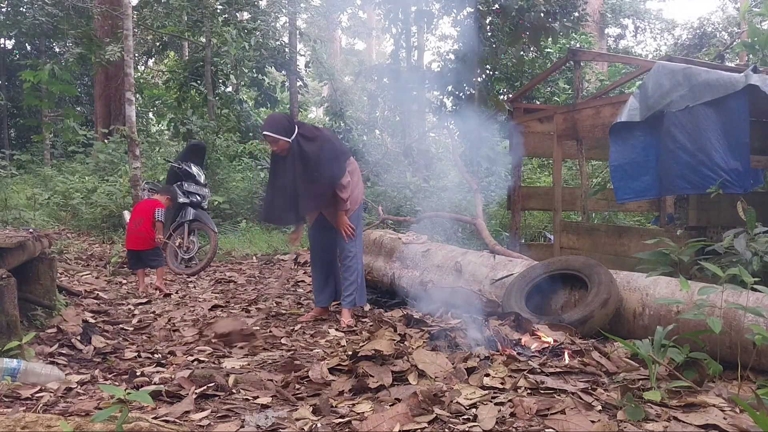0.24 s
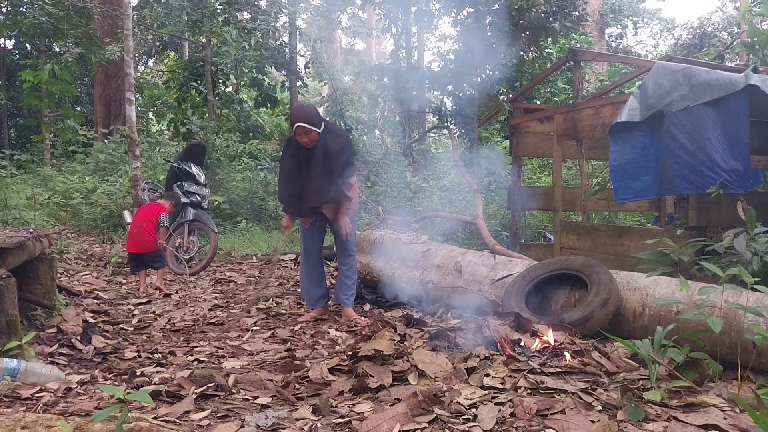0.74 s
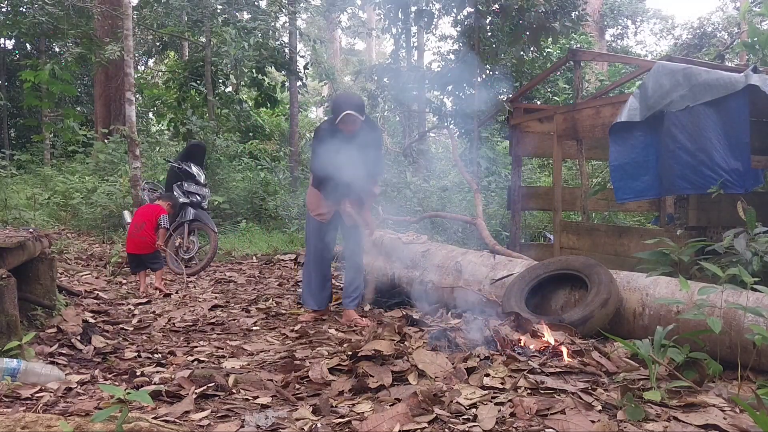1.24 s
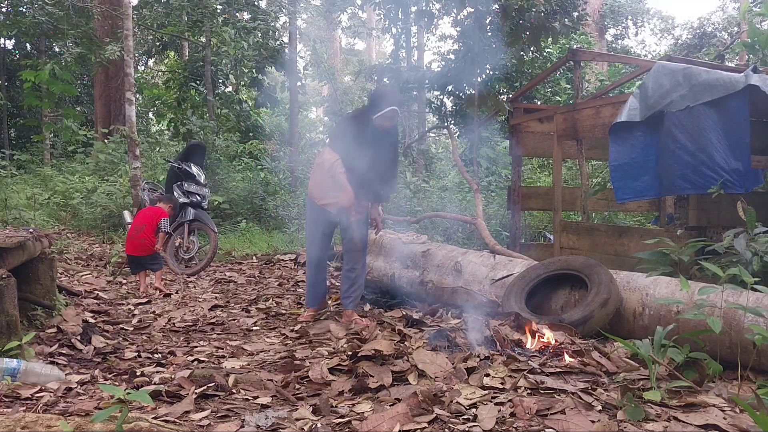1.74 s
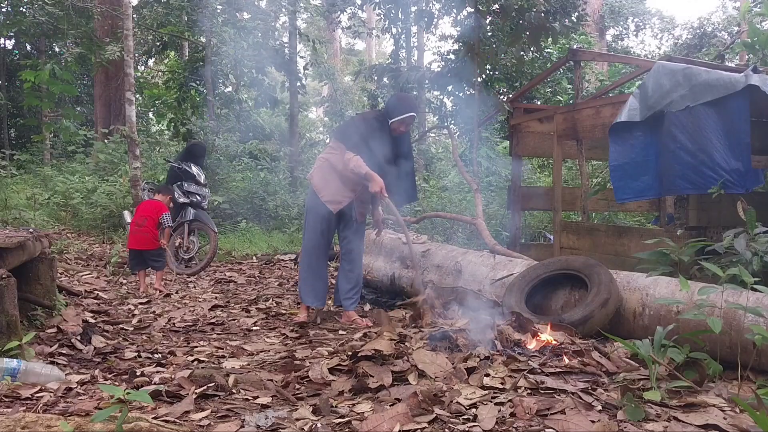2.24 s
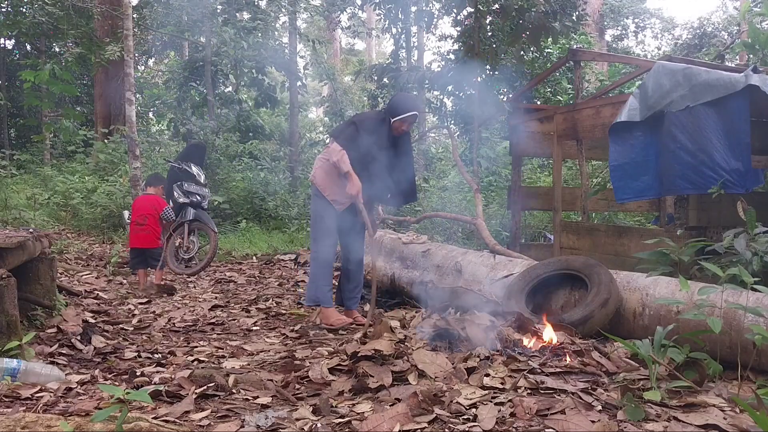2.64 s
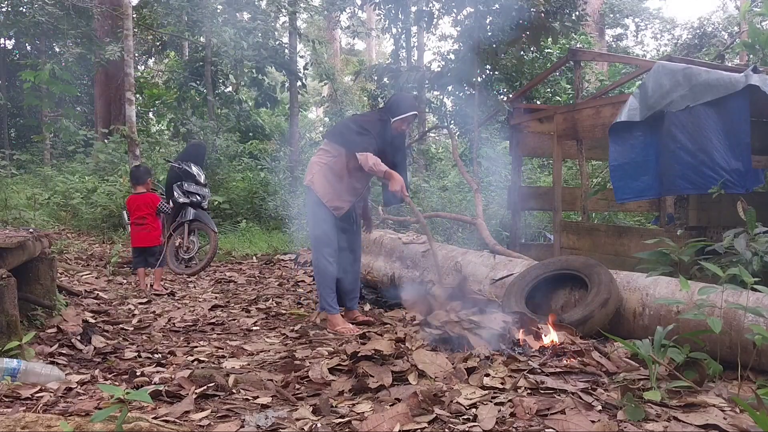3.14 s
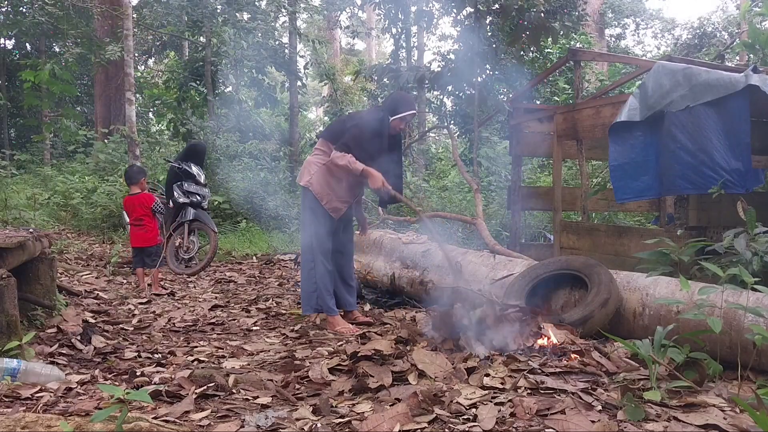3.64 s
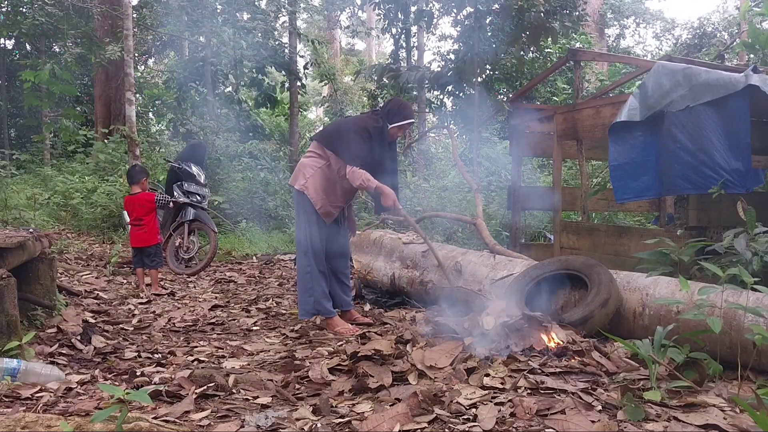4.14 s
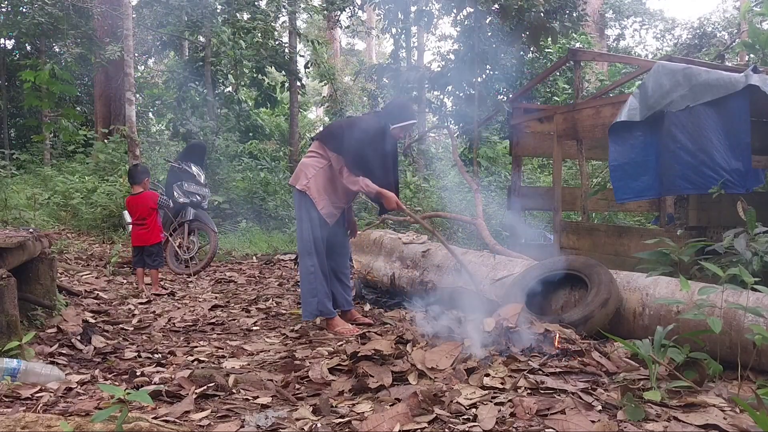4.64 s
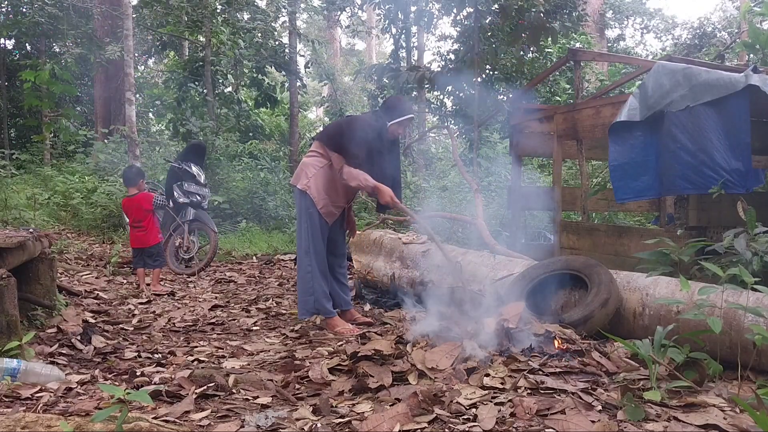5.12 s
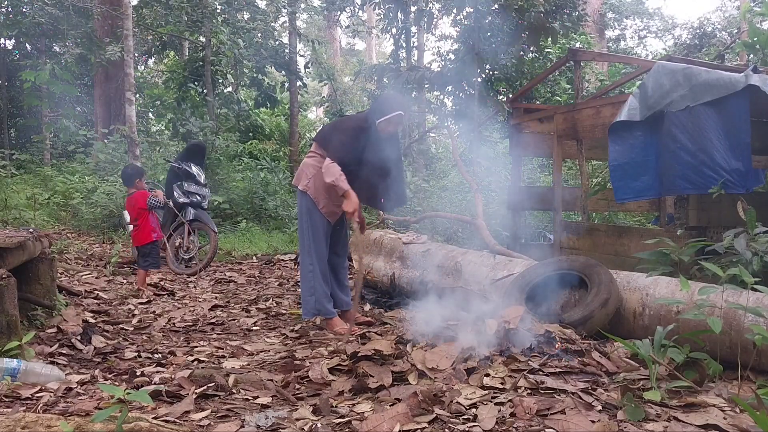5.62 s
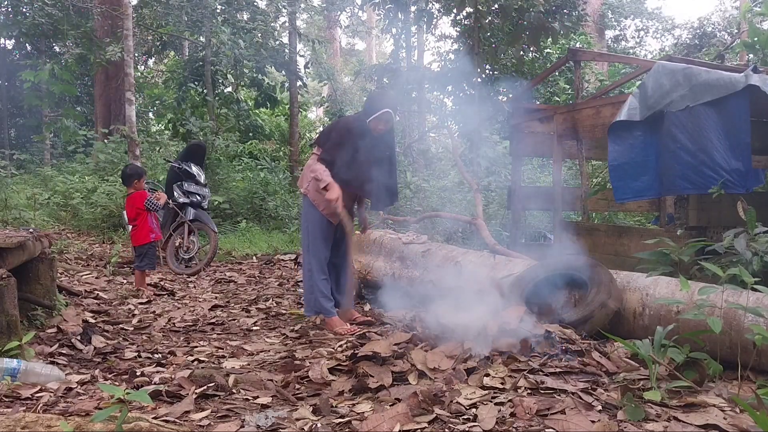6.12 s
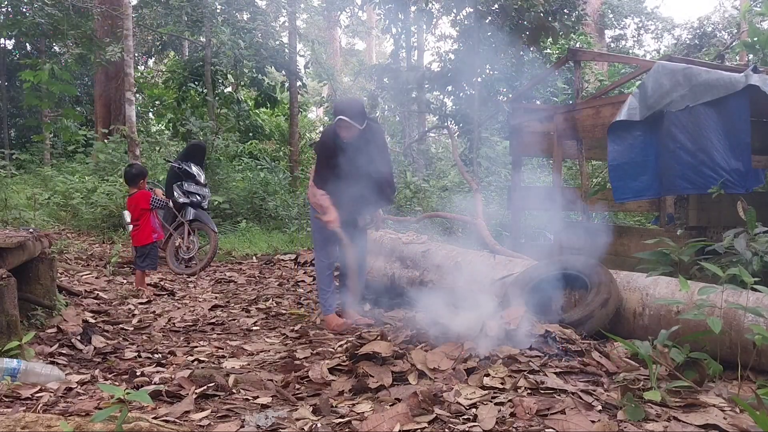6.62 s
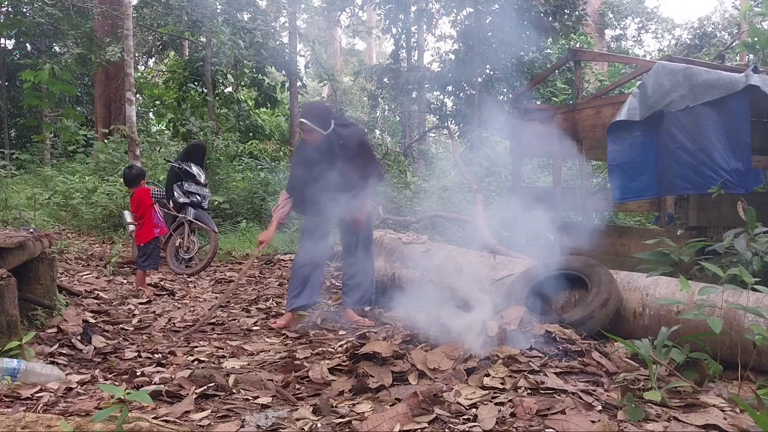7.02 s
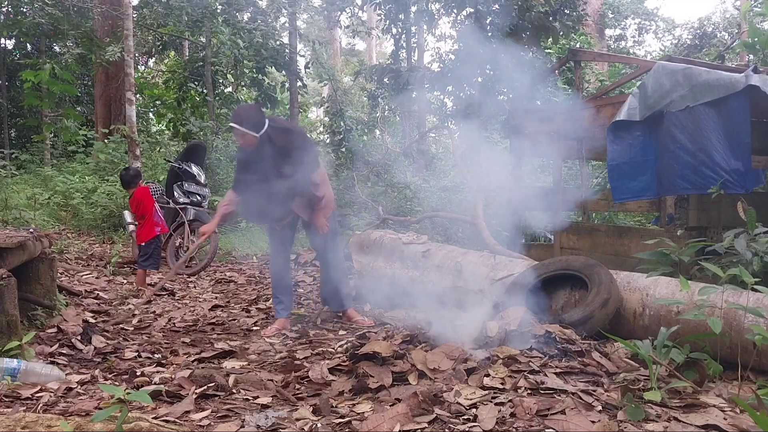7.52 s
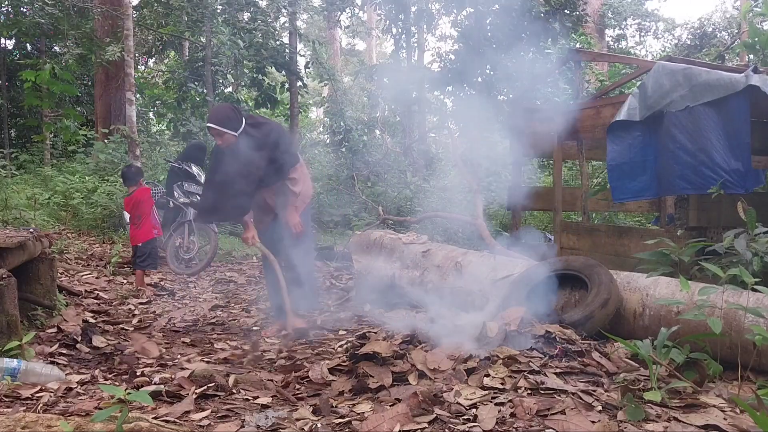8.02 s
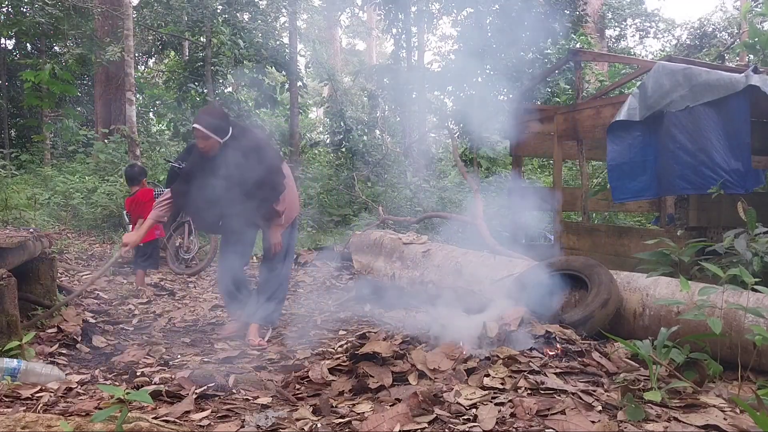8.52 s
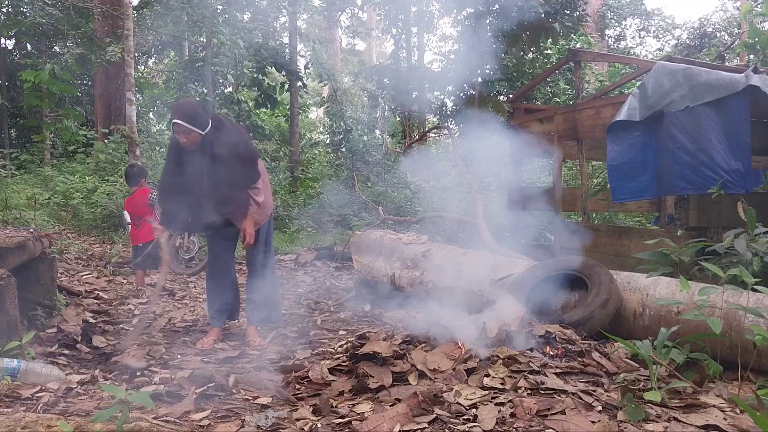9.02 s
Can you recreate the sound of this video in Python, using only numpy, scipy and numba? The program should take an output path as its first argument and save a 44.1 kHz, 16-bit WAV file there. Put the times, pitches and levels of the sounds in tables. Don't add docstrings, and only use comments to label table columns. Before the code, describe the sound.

Bursts of crisp leaf rustle, dull wood knocks and sharp twig cracks close by, while shrill cicadas swell and fade over a hissing chorus outdoors.

```python
import sys
import numpy as np
from scipy import signal
from scipy.fft import rfft, irfft, next_fast_len
from scipy.io import wavfile
from scipy.ndimage import uniform_filter1d
from numba import njit

SR = 44100
rng = np.random.default_rng(int(sys.argv[2]) if len(sys.argv) > 2 else 0)


def invert_db(x):
    u = np.asarray(x, float) / 20
    return 10 ** u


def master(y):
    cut = np.clip(np.atleast_2d(y).T, -1, 1)
    pcm = np.round(cut * 32767)
    wavfile.write(sys.argv[1], SR, pcm.astype(np.int16))


N = 408807
TIME = np.arange(N) / SR


def coloured(shape):
    size = next_fast_len(N)
    hz = np.arange(size // 2 + 1) * SR / size + 1
    x = irfft(rfft(rng.standard_normal(size)) * shape(hz), size)[:N]
    return x / x.std()


def band(hz, width_hz):
    return coloured(lambda f: 1 / (1 + ((f - hz) / width_hz) ** 2))


def walk(rate):
    k = int(SR / rate)
    steps = np.repeat(rng.standard_normal(N // k + 1), k)
    x = uniform_filter1d(uniform_filter1d(steps, k), k)[:N]
    return x / x.std()


def smooth_noise(size, hz):
    k = int(SR / hz)
    return uniform_filter1d(uniform_filter1d(rng.standard_normal(size), k), k) * np.sqrt(1.5 * k)


def gate(t0, t1, fade_s):
    return np.clip(np.minimum(TIME - t0, t1 - TIME) / fade_s + .5, 0, 1)


@njit
def grains(start, hz, cycles, size):
    out = np.zeros(N)
    for k in range(len(start)):
        decay = hz[k] / SR / cycles[k]
        p, z = np.exp(2j * np.pi * hz[k] / SR - decay), size[k] * np.e * decay + 0j
        first = int(start[k] * SR)
        for i in range(min(N - first, int(7 / decay))):
            out[first + i] += i * z.imag
            z *= p
    return out


def strike(rows):
    return grains(*np.array(rows, float).T.copy())


WANDER = walk(24)


def wander(on):
    return np.roll(WANDER, rng.integers(N))[on]


def song_span(s):
    return slice(max(0, int(s[0] * SR)), min(N, int(s[-1] * SR)))


def sing(s, ends_hz, parts, rough_db, rough_hz, rasp_db):
    on = song_span(s)
    t = TIME[on]
    bend = 1.5 if ends_hz[1] > ends_hz[0] else 1
    left = ((s[-1] - t) / (s[-1] - s[0])) ** bend
    hz = ends_hz[1] + (ends_hz[0] - ends_hz[1]) * left + 3 * wander(on)
    phase = 2 * np.pi * np.cumsum(hz) / SR
    skirt = 1 + invert_db(rough_db) * smooth_noise(len(t), rough_hz)
    skirt += invert_db(rasp_db) * smooth_noise(len(t), 700)
    skirt += invert_db(-32) * rng.standard_normal(len(t))
    askew = invert_db(rough_db) * smooth_noise(len(t), rough_hz)
    out = np.zeros(N)
    for k, db, flutter_db in parts:
        fade = invert_db(db + flutter_db * wander(on))
        out[on] += np.sqrt(2) * fade * (skirt * np.sin(k * phase) + askew * np.cos(k * phase))
    return out * gate(s[0] + .01 if s[0] else -1, s[-1] - .01, .02)


def near_cicadas():
    # time in seconds, whistle level in dB.
    songs = [
        [(0, -17.5), (.15, -14), (.38, -11.5), (.62, -13.5), (.87, -16.5), (1.3, -15), (1.47, -10), (1.65, -16),
         (2.27, -31)],
        [(2.26, -40), (2.3, -23), (2.42, -26.5), (2.53, -43)],
        [(5.33, -47), (5.41, -35), (5.55, -26), (5.67, -22), (5.82, -24.5), (5.98, -24.5), (6.14, -34),
         (6.21, -52)],
        [(7.25, -52), (7.46, -29), (7.65, -22.5), (7.8, -25), (7.94, -20.5), (8.05, -23), (8.14, -36),
         (8.28, -44), (8.35, -60)],
    ]
    glides = [(12089, 11917), (11915, 11896), (11782, 11910), (11797, 11938)]
    # start and end in seconds, level in dB, flutter in dB.
    drones = [
        (.28, 1.82, -36.5, .6),
        (2.36, 2.5, -46, 3),
        (5.42, 5.98, -46, 2.5),
        (7.32, 7.88, -44.5, 2.1),
    ]
    # time in seconds, depth in dB.
    dips = [(.08, -7), (.21, -4), (.43, -7), (.67, 2), (1.05, -4), (1.15, 3), (1.22, -4), (1.59, -5),
            (1.77, -11), (1.89, -8), (2.0, -2), (2.09, -7), (2.19, -9), (5.59, -10), (5.74, -13),
            (5.92, -8), (7.68, -10), (7.74, -11), (7.82, -6), (5.49, -4), (.27, -2), (8.2, -10)]
    # time in seconds, depth in dB.
    notches = [(5.95, -6), (6.008, -10), (6.09, -9), (7.56, -5), (7.668, -9), (8.024, -6), (8.068, -10),
               (8.1, -8), (5.43, -4), (7.4, -4)]
    # multiples of the whistle, then their dB under the lower side tone.
    side_ratios = [36 / 35, 33 / 35, 37 / 35, 32 / 35, 38 / 35]
    side_levels = [-8, -16, -19, -29, -24]
    # multiple of the belly tone, level in dB under it.
    belly_tones = [(2, -10), (3, -16), (5, -15)]
    out = np.zeros(N)
    for song, ends_hz, (t0, t1, drone_db, drone_flutter_db) in zip(songs, glides, drones):
        s, levels = np.transpose(song)
        on = song_span(s)
        t = TIME[on]
        whistle = np.interp(t, s, levels)
        swell = uniform_filter1d(whistle, int(.4 * SR), mode="nearest")
        side = -32.5 + .85 * (swell + 15)
        belly = drone_db - 9 * (1 - gate(t0, t1, .12)[on])
        for events, dip_s in ((dips, .025), (notches, .012)):
            whistle = whistle + sum(db * np.exp(-((t - at) / dip_s) ** 2) for at, db in events)
        levels = [(1, whistle), (34 / 35, side), (1 / 4, belly)]
        levels += [(k, side + db) for k, db in zip(side_ratios, side_levels)]
        levels += [(k / 4, belly + db) for k, db in belly_tones]
        parts = []
        for k, db in levels:
            flutter_db = drone_flutter_db if k <= 1 / 2 else .55 if k <= 1 else 3.2
            parts.append((k, db, flutter_db))
        out += sing(s, ends_hz, parts, -19, 70, -24 if s[0] < 5 else -17)
    return out


def far_singer(s, levels, ends_hz, flutter_db, rough_db, rough_hz, rasp_db=-24):
    whistle = np.interp(TIME[song_span(s)], s, levels)
    parts = [(1, whistle, flutter_db)]
    if ends_hz[0] > 8000:
        parts += [(1 / 4, whistle - 17, flutter_db)]
    return sing(s, ends_hz, parts, rough_db, rough_hz, rasp_db)


def thin_singers():
    # start and end in seconds, start and end pitch in Hz; then the level of each in dB.
    thin_songs = [(.85, 2.45, 11944, 11792), (2.45, 5.45, 12048, 11793), (2.45, 5.1, 12124, 11865),
                  (6.0, 7.0, 11760, 11825), (7.15, 9.0, 11571, 11790), (7.0, 7.6, 11150, 11216),
                  (8.95, 9.5, 11314, 11400), (6.1, 6.55, 2650, 2755), (6.6, 7.9, 2705, 2810),
                  (1.7, 2.35, 2690, 2790), (-.1, 1.8, 12298, 12150), (8.2, 8.9, 2790, 2860),
                  (9.1, 9.5, 11815, 11850), (3.5, 4.7, 11710, 11830), (7.45, 8.1, 11216, 11220),
                  (2.25, 2.65, 2660, 2800), (8.9, 9.5, 11090, 11040)]
    thin_levels = [-39, -47, -51, -49, -47.5, -42.5, -42, -59, -52, -54, -43, -58, -42, -55, -41, -53, -55]
    out = np.zeros(N)
    for (t0, t1, *ends_hz), db in zip(thin_songs, thin_levels):
        levels = db - 17.5 * np.array([1, 0, 0, 1])
        out += far_singer([t0, t0 + .13, t1 - .16, t1], levels, ends_hz, 3.2, -7, 55)
    return out


def steady_singers():
    # time in seconds, level in dB.
    swells = [
        [(7.25, -58), (7.38, -52), (7.45, -44), (7.6, -45), (7.72, -43), (7.85, -56)],
        [(7.2, -60), (7.33, -51), (7.45, -56), (7.6, -52), (7.78, -53), (7.86, -62)],
        [(7.42, -64), (7.5, -55), (7.7, -57), (7.8, -64)],
        [(9.08, -62), (9.15, -53), (9.23, -47), (9.4, -47)],
        [(.1, -60), (.16, -49), (.24, -48), (.3, -60)],
        [(0, -37), (.15, -38), (.25, -43), (.36, -52)],
        [(0, -45), (.11, -45), (.2, -58)],
        [(6.85, -64), (6.95, -60), (7.1, -60), (7.2, -64)],
        [(6.8, -64), (6.9, -59), (7.05, -60), (7.15, -64)],
        [(2.45, -60), (2.52, -51), (2.62, -52), (2.7, -60)],
    ]
    steady_glides = [(2545, 2695), (2295, 2430), (4790, 4850), (2945, 2965), (5270, 5280), (6045, 6030),
                     (2880, 2870), (4180, 4220), (5490, 5520), (5920, 5900)]
    return sum(far_singer(*np.transpose(song), hz, 1.5, -10, 70) for song, hz in zip(swells, steady_glides))


def crickets():
    # start and end in seconds, centre in Hz, width in Hz; then the level of each in dB.
    trills = [(-.1, 1.95, 1730, 70), (2.2, 2.7, 1800, 60), (3.3, 6.6, 1730, 70), (6.75, 7.25, 1835, 25),
              (8.2, 9.4, 1730, 70), (-.1, .75, 5945, 35), (.7, 1.7, 5970, 40), (-.1, 1.9, 7900, 800),
              (2.55, 2.95, 2450, 220), (2.1, 2.85, 2740, 70), (-.1, .35, 5050, 250), (2.9, 3.5, 2400, 200)]
    trill_levels = [-48, -54, -53, -56.5, -52, -38, -47, -45, -51, -51, -48, -54]
    out = np.zeros(N)
    for (t0, t1, hz, width_hz), db in zip(trills, trill_levels):
        out += gate(t0, t1, 0.051) * invert_db(db + walk(25)) * band(hz, width_hz)
    return out


def far_chorus():
    # centre in Hz, width in Hz, level in dB.
    chorus_bands = [
        (7045, 556, -38.5),
        (6300, 570, -61),
        (2850, 90, -60),
        (11900, 1500, -53),
    ]
    out = np.zeros(N)
    for hz, width_hz, db in chorus_bands:
        out += invert_db(db + 0.19 * walk(1.1) + 0.8 * walk(12)) * band(hz, width_hz)
    return out


def air():
    # frequency in Hz, density in dB per Hz.
    air_curve = [(20, -12), (60, -6.5), (183, -3.5), (411, -17.5), (900, -22.5), (1380, -40), (2300, -18),
                 (3300, -25), (5450, -48), (8600, -10.5), (10100, -14.5), (13600, -12), (15400, -20)]
    hz, db = np.transpose(air_curve)
    hiss = coloured(lambda f: invert_db(np.interp(np.log(f), np.log(hz), db)))
    return invert_db(-45.5 + 0.28 * walk(1.5)) * hiss


def stirring(t):
    # time in seconds, rustle level in dB.
    settling = [(0, -43), (.6, -42), (.85, -47), (1.3, -46), (1.55, -54), (1.85, -48), (2.7, -48),
                (3.7, -50), (4.5, -51), (4.9, -58), (5.5, -53), (6.2, -51), (6.9, -51), (7.6, -47),
                (8.3, -52), (8.6, -58), (9.0, -49), (9.27, -52)]
    # start in seconds, hold in seconds, rustle level in dB,
    # thump in dB over the rustle, crunch in dB over the rustle.
    pokes = [(.205, .07, -42, 6, 2), (.3, .17, -39.5, -6, -3), (.96, .06, -37, -16, -18),
             (1.04, 0.017, -37, -8, -8), (1.13, 0.06, -35, -8.5, -12), (1.866, .02, -30.5, -18, -13),
             (1.97, 0.072, -39, -4, 2.5), (2.91, 0.022, -39, -7, -3.5), (3.0, .1, -40.5, -4, -2),
             (3.12, .16, -43, 3, -2), (3.3, .11, -44, -4, -5), (3.94, .03, -49.5, -16, -3),
             (6.434, .1, -35, -14, -9), (6.5, .05, -41, -3, 3), (8.738, .04, -35.5, -5, -11)]
    rakes = [(.6, 0.034, -42, -12, -14), (1.17, 0.033, -41.5, -5, -3), (2.08, .1, -44.5, -6, -7),
             (2.33, 0.0046, -36, -11.5, -10), (4.0, .11, -44, -3, 1), (4.13, .16, -42, -1, -4),
             (4.6, 0.0081, -53.5, 4, -3), (5.0, 0.063, -34, 0, -1.5), (5.73, 0.055, -31, -10, -5.5),
             (7.24, 0.058, -47, -5.5, 2), (7.81, .12, -35.5, -4, -3), (7.74, .06, -41, -15, -22),
             (4.33, .13, -47, -4, -3), (3.5, .15, -50, -8, -10), (8.36, .01, -54, 5, -22),
             (8.02, 0.12, -44.5, -11, -10.5)]
    stamps = [
        (1.01, .015, -35, 1, -1),
        (8.79, .02, -38, 3, 3),
        (5.115, .02, -38, 0, -3),
        (.37, .02, -41, -1, 5),
        (.48, .015, -43, 0, 5),
    ]
    # fall after a stroke in dB per second, then resting level in dB.
    release = [125, 120, 76, 71.5]
    rest = [-10.5, -19, 0.5, -2.5]
    power = invert_db(np.interp(t, *np.transpose(settling)) + np.array(rest)[:, None]) ** 2
    # strokes, rise in seconds, how many times quicker they die
    for strokes, rise_s, pace in ((pokes, .017, 1), (rakes, .08, 1), (stamps, .017, 2.5)):
        for start, hold_s, db, thump_db, crunch_db in strokes:
            top = start + rise_s
            rising = 20.5 / rise_s * np.clip(top - t, 0, None)
            dying = pace * np.outer(release, np.clip(t - top - hold_s, 0, None))
            balance = np.array([[thump_db], [crunch_db], [0], [-6.5]])
            power = power + invert_db(db + balance - rising - dying) ** 2
    return 10 * np.log10(power)


def leaves():
    # centre in Hz, level in dB per octave over its curve.
    families = [
        (600, -1),
        (1150, -.2),
        (4200, 0.5),
        (14000, 9),
    ]
    cracks, count = 5000, 8
    low_hz, top_hz, cycles, spread_db = 130, 15500, 1.104, 1.7
    chance = rng.random((int(cracks * N / SR), 4, count))
    when = chance[:, 0, :1] * N / SR + .002 * chance[:, 1]
    octaves = np.log2(top_hz / low_hz)
    hz = low_hz * 2 ** (octaves * chance[:, 2])
    s = np.arange(0, N / SR, .002)
    family_db = np.array([np.interp(when, s, c) + db for c, (_, db) in zip(stirring(s), families)])
    place = np.interp(np.log(hz), np.log([f for f, _ in families]), np.arange(4))
    db = sum(np.clip(1 - abs(place - k), 0, 1) * family_db[k] for k in range(4))
    db += -spread_db * np.log(1 - .995 * chance[:, 3, :1]) - spread_db
    at = (when * SR).astype(int).clip(0, N - 1)
    db += 1.3 * np.where(hz < 1500, 1.15 * walk(30)[at], walk(80)[at])
    db -= 9 * np.clip(np.log2(295 / hz), 0, 2)
    share = np.clip(hz / 2500, .05, 1)
    keep = chance[:, 3, ::-1] < share
    size = invert_db(db) * np.sqrt(hz * octaves / (cycles * cracks * count * share))
    return grains(when[keep], hz[keep], np.full(keep.sum(), 1. * cycles), size[keep])


def knocks():
    # time in seconds, peak in dB, pitch in Hz.
    wood_knocks = [(0.224, -24, 293), (1.0327, -16, 1050), (1.0432, -12, 800), (1.0395, -20, 600),
                   (1.069, -23, 560), (1.15, -20, 830), (5.136, -15, 400), (6.08, -35, 191),
                   (8.07, -21, 640), (8.79, -19, 400), (8.8055, -14, 420), (8.812, -12, 520),
                   (8.8165, -16, 640), (8.82, -11, 380), (8.806, -20, 170), (8.828, -19, 500)]
    return strike([(s, hz, .6, invert_db(db - 3.5)) for s, db, hz in wood_knocks])


def thuds():
    # time in seconds, peak in dB, pitch in Hz.
    twig_thuds = [(0.284, -24, 829), (0.375, -25, 1030), (0.39, -23, 1020), (0.467, -26, 929),
                  (0.497, -23, 1050), (1.003, -30, 1150), (1.177, -26, 958), (1.239, -33, 1060),
                  (1.261, -29, 627), (1.306, -30, 972), (1.971, -28, 1400), (2.168, -32, 595),
                  (2.339, -37, 396), (2.399, -34, 867), (2.935, -31, 1010), (3.137, -31, 301),
                  (3.187, -27, 336), (4.085, -32, 514), (4.265, -30, 393), (4.298, -28, 452),
                  (5.028, -35, 536), (5.062, -26, 824), (5.097, -22, 369), (5.818, -23, 1490),
                  (5.877, -26, 396), (6.459, -31, 1340), (6.487, -28, 1260), (6.522, -25, 864),
                  (7.901, -27, 358), (7.93, -30, 993), (8.008, -28, 786), (8.733, -34, 326),
                  (8.758, -27, 463), (8.853, -30, 563)]
    modes = ((1, -4), (1.6, -9))
    return strike([(s, hz * k, .9, invert_db(db + under)) for s, db, hz in twig_thuds for k, under in modes])


def spray(count=5):
    lag, step = rng.random((2, count))
    return list(zip(lag, np.arange(count) / count + step / count))


def ticks():
    # time in seconds, peak in dB.
    treble_ticks = [(0.8444, -16), (1.3109, -28), (1.4686, -28), (1.8477, -11), (2.15, -27), (2.2149, -29),
                    (2.7694, -33), (2.83, -21), (3.282, -21), (4.0517, -24), (4.4564, -21), (6.538, -18),
                    (6.6436, -19), (6.6, -24), (6.57, -23), (7.1417, -32), (7.9279, -24), (8.7842, -18)]
    rows = []
    for s, db in treble_ticks:
        rows += [(s + .001 * a, 10500 * 1.26 ** b, 2.5, invert_db(db - 4.0)) for a, b in spray()]
    return strike(rows)


def snaps():
    # time in seconds, peak in dB, ring in Hz, treble in dB.
    twig_snaps = [(1.0031, -20, 4160, -30), (1.1513, -21, 3530, -30), (1.157, -9, 6300, -31),
                  (1.7524, -19, 5300, -33), (1.8762, -9, 7340, -21), (1.889, -9, 6740, -29),
                  (3.956, -21, 2600, -49), (4.2667, -24, 4760, -43), (5.0753, -17, 3810, -37),
                  (5.1379, -15, 3800, -34), (5.138, -13.5, 2300, -50), (5.876, -11, 3580, -29),
                  (6.2667, -24.5, 5000, -31), (6.445, -25, 4370, -42), (8.072, -22, 2500, -45),
                  (8.1544, -23, 4230, -47), (8.22, -20.5, 4350, -53), (8.751, -25, 4340, -37),
                  (8.7914, -17, 5030, -39), (8.8112, -19, 5130, -32)]
    rows = []
    for s, db, hz, treble_db in twig_snaps:
        burst = spray()
        rows += [(s, hz, 1.4, invert_db(db - 2.5))]
        rows += [(s + .002 * a, hz * 3 ** (b - .6), 1.5, invert_db(db - 18.0)) for a, b in burst]
        rows += [(s + 0.0028 * a, 7000 * 2.17 ** b, 3, invert_db(treble_db + 7.5)) for a, b in burst]
    return strike(rows)


def stick_rings():
    # time in seconds, peak in dB, pitch in Hz, cycles to the peak.
    stick_modes = [(1.8752, -7, 7370, 6), (1.8752, -11, 7900, 7), (1.8755, -12, 6210, 5),
                   (1.8768, -13, 10400, 5), (1.8758, -16, 2050, 1.8), (1.8764, -19, 2780, 2.2),
                   (1.877, -18, 4230, 3.5), (1.8772, -21, 4990, 4), (1.0328, -14, 1900, 2.5),
                   (1.0258, -26, 1950, 1.2), (1.0395, -23, 1750, 1.8), (8.8115, -20, 1850, 2.1),
                   (1.8848, -20, 5000, 3)]
    return strike([(s, hz, cycles, invert_db(db)) for s, db, hz, cycles in stick_modes])


def leaf_cracks():
    # time in seconds, peak in dB, pitch in Hz.
    stiff_cracks = [(1.2391, -26, 2400), (1.9749, -22, 2340), (2.39, -24, 4600), (2.4244, -17, 3200),
                    (2.4907, -29, 2790), (2.7008, -30, 2470), (2.7661, -29, 2550), (2.9253, -25, 3210),
                    (2.945, -24, 3500), (3.0061, -26, 2310), (3.2246, -27, 3160), (3.4186, -30, 2500),
                    (3.532, -30, 1600), (3.6571, -27, 4820), (4.2672, -23, 2240), (4.4318, -30, 2300),
                    (5.0399, -27, 2750), (5.1811, -20, 2360), (5.903, -20, 3300), (6.0107, -30, 3300),
                    (6.3335, -28, 3600), (6.478, -23, 4500), (6.499, -21, 4300), (6.52, -23, 4600),
                    (7.2724, -30, 4300)]
    modes = ((1, -3), (1.45, -9), (.7, -10))
    return strike([(s, hz * k, 1.3, invert_db(db + under)) for s, db, hz in stiff_cracks for k, under in modes])


def sputter():
    # start and end in seconds, centre in Hz, width in Hz; then the level of each in dB.
    stutters = [
        (2.34, 2.5, 11850, 200),
    ]
    stutter_levels = [-28.5]
    out = np.zeros(N)
    for (t0, t1, hz, width_hz), db in zip(stutters, stutter_levels):
        out += gate(t0, t1, 0.078) * invert_db(db + 2.9 * walk(90)) * band(hz, width_hz)
    return out


def falling_song():
    # time in seconds, level in dB.
    long_swell = [(2.5, -40), (3.1, -40.5), (3.4, -38.5), (3.85, -44.5), (4.18, -32.5), (4.4, -45),
                  (5.1, -37.5), (5.7, -37.5), (6.4, -38), (6.55, -50)]
    long_glide = 11792, 11389
    return far_singer(*np.transpose(long_swell), long_glide, 2.0, -7, 55, rasp_db=-18)


def ember_pops():
    # time in seconds, peak in dB, pitch in Hz.
    pops = [
        (6.0825, -20, 1700),
        (3.9555, -21, 2000),
        (8.7515, -15, 4600),
    ]
    return strike([(s, hz, .3, invert_db(db)) for s, db, hz in pops])


def scene():
    insects = near_cicadas() + thin_singers() + steady_singers() + crickets() + far_chorus()
    insects += sputter() + falling_song()
    close = leaves() + knocks() + thuds() + ticks() + snaps()
    close += stick_rings() + leaf_cracks() + ember_pops()
    close = close - .5 * signal.lfilter(*signal.iirpeak(9200, 2.5, SR), close)
    tail = rng.standard_normal(6000) * np.exp(-np.arange(6000) / SR / .03)
    scatter = signal.fftconvolve(close, tail / np.sqrt(np.sum(tail ** 2)))[:N]
    mono = close + invert_db(-12.5) * scatter + insects + air()
    return np.array([mono, mono])


def band_limit(x):
    return signal.sosfilt(signal.butter(12, 15730, fs=SR, output="sos"), x)


def record(dry):
    x = signal.sosfilt(signal.butter(2, 45, "high", fs=SR, output="sos"), dry)
    limited = x / (1 + x ** 4) ** .25
    mix = signal.sosfilt(signal.ellip(8, .2, 60, 15480, fs=SR, output="sos"), limited)
    return band_limit(mix)


dry = scene()
out = record(dry)
master(out)
```